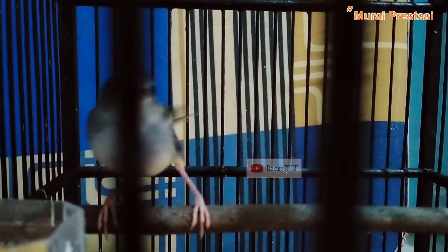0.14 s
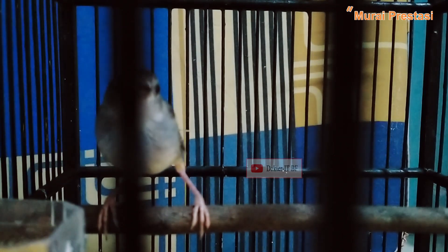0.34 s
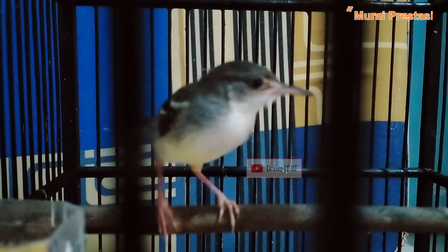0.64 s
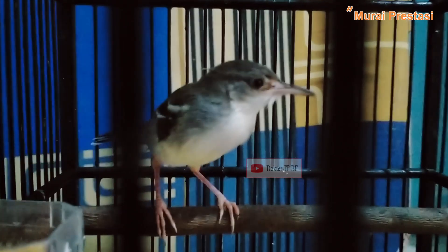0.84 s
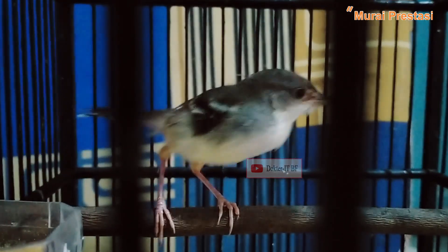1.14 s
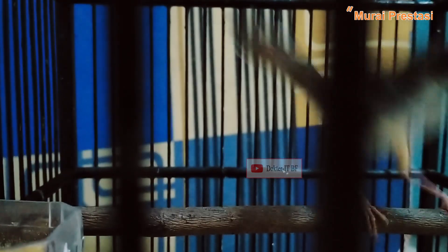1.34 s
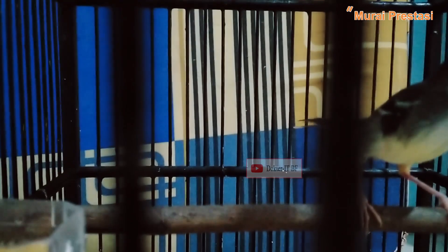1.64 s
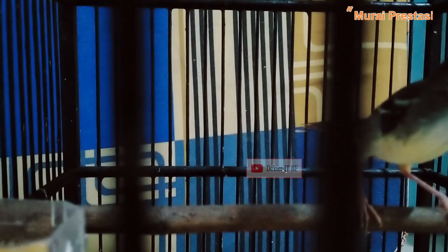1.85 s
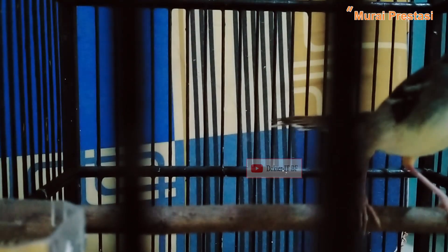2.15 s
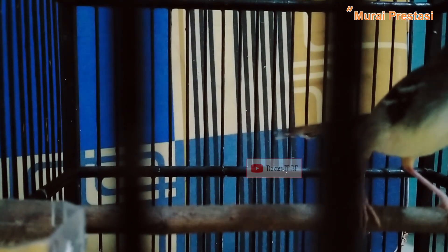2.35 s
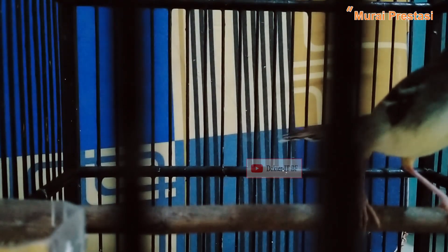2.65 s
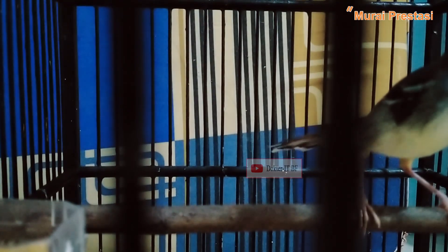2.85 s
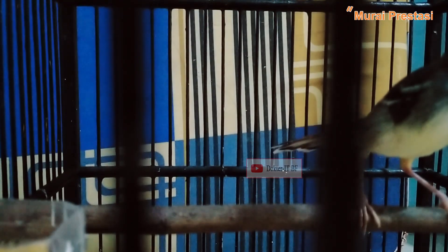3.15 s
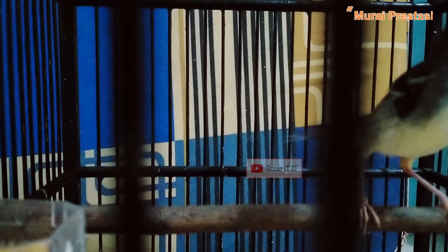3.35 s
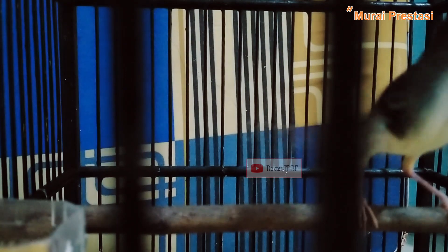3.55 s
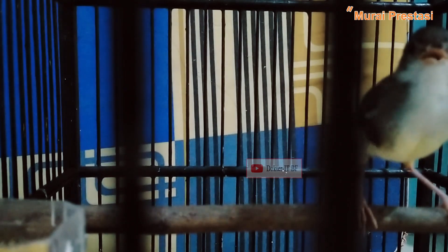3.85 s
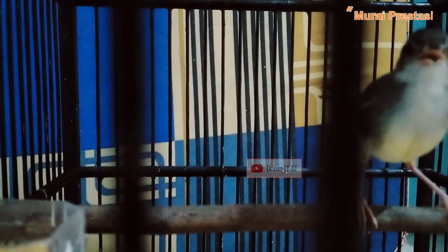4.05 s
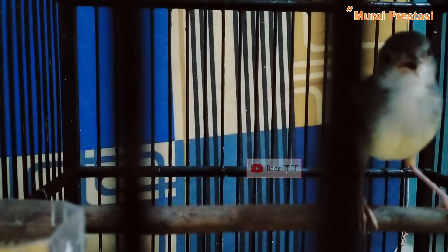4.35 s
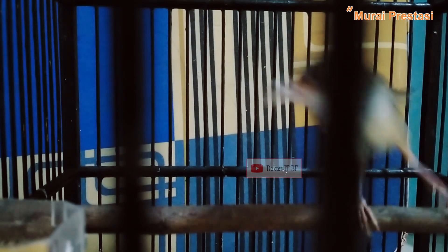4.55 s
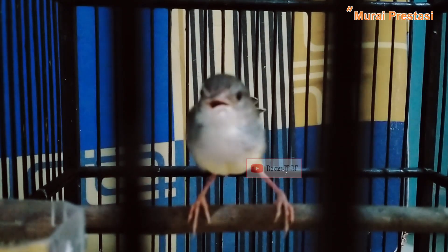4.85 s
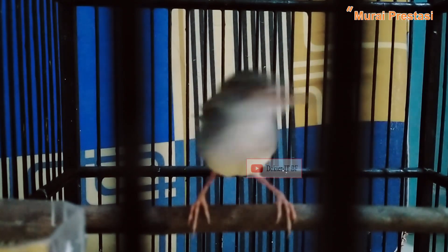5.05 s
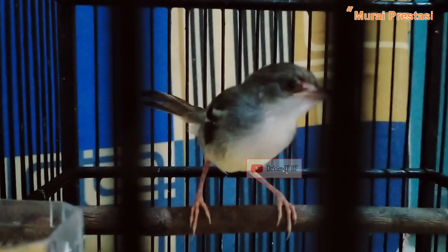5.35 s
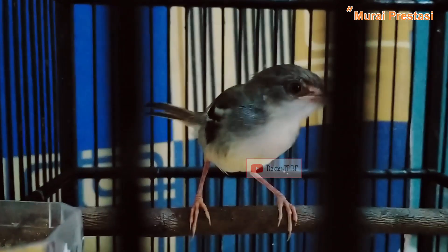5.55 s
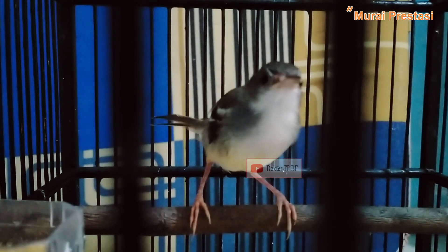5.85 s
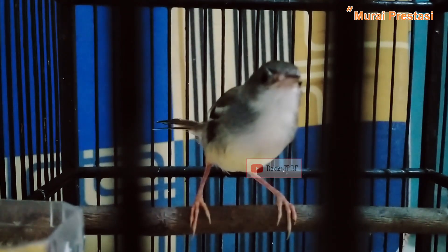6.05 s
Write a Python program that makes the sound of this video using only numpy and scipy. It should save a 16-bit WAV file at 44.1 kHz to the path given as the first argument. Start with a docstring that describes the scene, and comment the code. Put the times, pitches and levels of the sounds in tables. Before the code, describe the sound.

A small caged bird shuffles on its perch, then gives five loud, sharp whistled notes over distant birds and a faint passing vehicle.

```python
"""On a sheltered porch a small caged bird gives five loud whistled notes and shuffles about its perch.
Its syrinx sounds a harmonic series, coloured by throat and beak and echoed by the porch and the walls
beyond; its feathers and feet rustle by friction. Other birds whistle far off, and a vehicle passes in
the street with a throbbing engine boom and a roar of tyres. A deep hum and a soft hiss lie under it all."""
import sys
import numpy as np
from scipy import signal
from scipy.fft import rfft, irfft
from scipy.io import wavfile
from scipy.ndimage import map_coordinates

SR = 44100
rng = np.random.default_rng(int(sys.argv[2]) if len(sys.argv) > 2 else 0)


def unload_wav(signal):
    """Save mono or channel-first audio to the path in sys.argv[1] as 16-bit WAV at rate SR, clipped to [-1, 1]."""
    wavfile.write(
        sys.argv[1],
        SR,
        np.round(np.clip(np.atleast_2d(signal).T, -1, 1) * 32767).astype(np.int16),
    )


N = 273155
T = np.arange(N) / SR

# Bright microphone colouring heard on the hiss and rustles: a peak near 8 kHz and a rise toward 15 kHz.
# Each row: frequency in Hz, relative level in dB.
MICROPHONE_COLOUR = [(1500, -4.5), (3000, 1), (5000, -8), (7000, -6.5), (7900, 0.5), (9000, -11),
                     (12000, -11), (14000, -5.5), (15700, -1.5), (20000, 2.5)]


def from_db(db):
    """Amplitude ratio: a factor of ten for every 20 dB."""
    return 10 ** (np.asarray(db) / 20)


def rms_one(x):
    """Normalisation to unit mean power."""
    return x / np.sqrt(np.mean(x ** 2) + 1e-20)


def in_time(rows, t=T):
    """Linear interpolation of each column between the times in the first."""
    times, *columns = np.transpose(rows)
    return [np.interp(t, times, column) for column in columns]


def drift(hz):
    """Random fluctuation of unit rms: white noise twice through a one-pole low-pass."""
    pole = np.exp(-2 * np.pi * hz / SR)
    once = signal.lfilter([1], [1, -pole], rng.standard_normal(N + SR))
    return rms_one(signal.lfilter([1], [1, -pole], once)[SR:])


def coloured(spectrum):
    """Spectral shaping: white noise weighted by levels over log frequency, at unit rms."""
    hz, level_db = np.transpose(spectrum)
    log_hz = np.log(np.arange(1, N // 2 + 2) * SR / N)
    gain = from_db(np.interp(log_hz, np.log(hz), level_db))
    return rms_one(irfft(rfft(rng.standard_normal(N)) * gain, N))


def resonance(x, hz, width_hz):
    """A damped resonator: two poles, unit gain at the peak."""
    r = np.exp(-np.pi * width_hz / SR)
    gain = (1 - r * r) / 2
    return signal.lfilter([gain, 0, -gain], [1, -2 * r * np.cos(2 * np.pi * hz / SR), r * r], x)


def echoes(x, t60_s, gap_s=.0065):
    """Reverberation: after a short gap, dense reflections decay exponentially; the tail has unit energy."""
    t = T[:SR // 2]
    tail = rng.standard_normal(len(t)) * from_db(-60 * t / t60_s) * (t > gap_s)
    return signal.fftconvolve(x, tail / np.sqrt(np.sum(tail ** 2)))[:N]


def hiss():
    """Broadband ambient noise: a dull floor and a swelling, ebbing treble coloured by the microphone."""
    # Each row: frequency in Hz, relative spectral density in dB.
    floor_spectrum = [(45, -14), (62, -3), (95, 1), (200, -8), (380, -11.5), (445, -1.5), (520, -11.5),
                      (900, -12.5), (2400, -22), (4500, -36), (7000, -61)]
    # Each row: time in seconds, level in dB.
    treble_swell = [(0, -67.5), (.5, -66.5), (.7, -64), (1.4, -64.5), (2.2, -61.5), (3.1, -66),
                    (3.4, -59.5), (4.5, -61), (4.9, -67.5), (5.55, -69), (6.19, -65)]
    floor = from_db(-63 + .7 * drift(3)) * coloured(floor_spectrum)
    treble = from_db(in_time(treble_swell)[0] + .8 * drift(6)) * coloured(MICROPHONE_COLOUR)
    return floor + treble


def hum(pitch_hz=27.6):
    """A deep tone, as from a fan or pump, under slight random amplitude and frequency modulation."""
    # Each row: time in seconds, level in dB.
    swell = [(0, -54), (.6, -52), (1.5, -51), (4.3, -50.5), (6.19, -52)]
    level_db = in_time(swell)[0] + .72 * drift(3.6)
    phase = 2 * np.pi * np.cumsum(pitch_hz + .28 * drift(1.6)) / SR
    return np.sqrt(2) * from_db(level_db) * np.sin(phase)


def passing(start_s, end_s, top_db, rise_db_per_s, fade_db_per_s):
    """Level falls with distance: a source nears, holds its top level from start to end, and recedes."""
    return top_db - rise_db_per_s * np.maximum(start_s - T, 0) - fade_db_per_s * np.maximum(T - end_s, 0)


def vehicle(throb_hz=6.3):
    """Noise-driven resonances make the engine's boom, which throbs while near; tyres add a broad roar."""
    # Each row: resonance frequency in Hz, bandwidth in Hz, relative gain in dB.
    engine_modes = [(48.3, 12, -1), (77.4, 12, 0), (145, 12, -1.5), (182, 26, -25.5), (224.4, 5, -4.5),
                    (287, 13, -18.5), (419, 19, -17)]
    # Each row: frequency in Hz, relative spectral density in dB.
    tyre_spectrum = [(180, -29.5), (300, -6), (576, -9), (704, 0), (1100, -0.5), (1280, -4.5), (2340, -6),
                     (4220, -28.5), (6000, -38), (7800, -37.5), (13200, -120)]
    noise = rng.standard_normal(N)
    boom = sum(from_db(gain_db) * resonance(noise, hz, width) for hz, width, gain_db in engine_modes)
    near = np.clip((1.3 - T) / .25, 0, 1)
    throb_db = 3 * near * np.cos(2 * np.pi * throb_hz * (T - .78))
    roar = coloured(tyre_spectrum) * from_db(passing(.76, 2.3, -57.5, 90, 26) + .7 * drift(14))
    boom_db = passing(.77, 1.22, -49.5, 75, 11) + throb_db + 1.2 * drift(8)
    return rms_one(boom) * from_db(boom_db) + roar


def far_birds():
    """Pure-tone glides, smeared in pitch and level by propagation across the yards."""
    # Each row: start and end in seconds, first and last pitch in Hz, relative level in dB, blur (0 to 1).
    glides = [(0, 0.07, 2150, 2190, -65, 0.47), (0, 0.107, 3120, 3000, -79, 0.3),
              (0, .07, 1750, 1730, -74, 0), (0.135, .26, 2004, 1950, -70, 0.42),
              (0.399, .51, 2780, 2857, -65, 0.1), (0.518, .66, 2790, 2810, -75, 0.37),
              (0.448, .49, 4230, 4541, -60.5, 0.7), (0.468, .792, 4500, 4400, -64.5, 0.36),
              (.5, .587, 5220, 4920, -65.5, 0.66), (0.458, .58, 13230, 13800, -65, 0.45),
              (.59, .7, 8160, 8230, -70, 0.6), (0.631, .72, 4176, 4030, -61.5, 0.59),
              (0.639, .718, 4012, 3900, -61.5, 0.59), (0.617, .68, 3500, 3350, -66, .2),
              (0.663, .715, 2750, 2460, -63.5, 0), (0.754, .9, 2400, 2354, -59.5, 0.07),
              (.716, 1.295, 9300, 9040, -78, 0.8), (1.421, 1.527, 4480, 4427, -74, 0.32),
              (1.511, 1.695, 5680, 5840, -74, .5), (1.92, 2.124, 4470, 4450, -75, 0.47),
              (2.539, 2.61, 4480, 4640, -62.5, .99), (2.543, 2.666, 4054, 3600, -66, 0.93),
              (2.634, 2.774, 3650, 3417, -62.5, 0.84), (2.6, 3.24, 9150, 9120, -76, 0.65),
              (3.993, 4.14, 2778, 2750, -48, 0.34), (4.139, 4.358, 2730, 2710, -50, 0.5),
              (4.505, 4.729, 2254, 2250, -58, 0.24), (4.767, 5.057, 2522, 2555, -57, 0.43),
              (4.909, 5.03, 3065, 2850, -61.5, 0.6), (4.986, 5.039, 5370, 4440, -63.5, 1),
              (4.989, 5.066, 4040, 3780, -63, 0.78), (5.602, 5.72, 3760, 3060, -65.5, .75),
              (5.686, 5.864, 2974, 2860, -64.5, 0.44), (5.953, 5.99, 12600, 12400, -73, .97),
              (6.103, 6.187, 6880, 6830, -62, 0.43), (6.105, 6.174, 3100, 3134, -65, 0.6)]
    out, waver, flutter = np.zeros(N), drift(200), drift(25)
    for start, end, start_hz, end_hz, level_db, blur in glides:
        part = slice(int(start * SR), int(end * SR))
        progress = np.linspace(0, 1, len(T[part]))
        hz = start_hz + (end_hz - start_hz) * progress + 330 * blur ** 2 * waver[part]
        envelope = np.sin(np.pi * progress) ** .3 * from_db(level_db + 3 * blur * flutter[part])
        out[part] += np.sqrt(2) * envelope * np.sin(2 * np.pi * np.cumsum(hz) / SR)
    return .75 * out + from_db(-4) * echoes(out, t60_s=.55)


def rustles(brush_from_hz=1500, scuff_spread=1.45):
    """Friction noise on perch and bars: a grainy brush of feathers over a duller scuff of feet."""
    # Each row: start and length in seconds, brush level in dB, top of the brush band in Hz,
    # centre of the scuff band in Hz, scuff level in dB.
    shuffles = [(0.296, 0.046, -72, 9100, 2030, -67), (0.914, 0.22, -53, 19000, 730, -47),
                (1.199, 0.13, -57.5, 19000, 2800, -55.5), (1.722, 0.27, -54.5, 19000, 750, -51),
                (2.169, .2, -62.5, 8950, 1640, -49), (2.264, 0.095, -51.5, 19000, 1220, -59),
                (2.443, 0.16, -57, 8300, 2320, -53), (2.813, .1, -59.5, 8750, 1990, -71),
                (3.026, 0.047, -66, 6000, 910, -62), (4.981, 0.0068, -59, 15400, 4000, -65),
                (5.074, 0.091, -63.5, 8535, 1115, -70), (5.3, 0.092, -65.5, 5000, 550, -58),
                (5.85, .18, -76, 4985, 1964, -67), (6.089, 0.12, -50.5, 18900, 2030, -78)]
    out = np.zeros(N)
    grain = coloured([(100, 0), *MICROPHONE_COLOUR[1:]]) * from_db(1.3 * drift(35))
    for start, length, brush_db, top_hz, scuff_hz, scuff_db in shuffles:
        part = slice(int(start * SR), int((start + 2 * length) * SR))
        progress = (T[part] - start) / length
        envelope = np.clip(progress * 4, 0, 1) * np.exp(-1.2 * progress ** 2)   # quick start, softer end
        scuff_edges = [scuff_hz / scuff_spread, scuff_hz * scuff_spread]
        for edges, level_db in [([brush_from_hz, top_hz], brush_db), (scuff_edges, scuff_db)]:
            band = signal.butter(2, edges, "band", fs=SR, output="sos")
            out[part] += from_db(level_db) * envelope * rms_one(signal.sosfilt(band, grain[part]))
    return out


def unsteady_pitch(tremble_share=.009, wander_share=.003):
    """Random frequency modulation: a pitch ratio near 1 with a fast tremble and a slower wander."""
    tremble = rng.standard_normal(N)
    for _ in range(3):   # steep skirts keep the gaps between the partials clear
        tremble = rms_one(resonance(tremble, hz=110, width_hz=180))
    return 1 + tremble_share * tremble + wander_share * drift(35)


def voice_catches():
    """Share of pitch lost as the voice catches: a sudden drop, then exponential relaxation."""
    # Each row: start in seconds, approximate share of pitch lost, recovery time constant in seconds.
    catches = [(3.259, .2, .003), (3.535, .15, .002), (3.541, .16, .002), (3.56, .22, .002),
               (3.938, .03, .003)]
    drop = np.zeros(N)
    for start, depth, recovery in catches:
        age = np.maximum(T - start, 0) / recovery
        drop += depth * 1.6 * (np.exp(-age) - np.exp(-6 * age))
    return drop


def partial_levels(effort_db, closing, turn_db, usual_db=-19.5, third_full_db=-20.5):
    """Spectral envelope in dB: partials grow with effort and shift as the beak closes and the head turns."""
    # Each row, for partials 1 to 6: level at usual effort in dB, dB gained per dB of effort,
    # change in dB as the beak closes.
    partials = [(-42.5, 0.18, 2), (-19.5, 1, 0.5), (-26, 0.67, -11), (-61.5, 0.04, 17), (-50, 0.43, -1.5),
                (-27, 0.6, 2)]
    base_db, growth, closing_db = np.transpose(partials)[:, :, None]
    drive_db = np.tile(effort_db - usual_db, (6, 1))
    drive_db[2] = np.minimum(drive_db[2], third_full_db - usual_db)   # the third partial saturates
    level_db = base_db + growth * drive_db + closing_db * closing
    level_db[[2, 4, 5]] += np.array(turn_db)[:, None]
    return level_db


def caged_bird(fall_to_share=.4, fall_rough=.09):
    """Source and filter: harmonics of the syrinx slide through the colour set by throat and beak."""
    # The held part of each note. Each row: time in seconds, pitch in Hz,
    # effort in dB (about the level of the second partial).
    notes = [
        [(3.266, 2419, -37), (3.299, 2418, -27), (3.332, 2451, -22), (3.364, 2449, -20), (3.397, 2447, -15),
         (3.43, 2419, -17)],
        [(3.536, 2479, -30), (3.567, 2494, -30), (3.598, 2437, -22), (3.63, 2426, -16), (3.661, 2409, -14),
         (3.692, 2388, -15)],
        [(3.811, 2417, -29), (3.841, 2404, -26), (3.871, 2392, -22), (3.902, 2371, -20), (3.932, 2357, -21),
         (3.962, 2328, -26)],
        [(4.091, 2381, -35), (4.117, 2361, -27), (4.143, 2356, -22), (4.17, 2396, -19), (4.196, 2373, -16),
         (4.222, 2339, -14)],
        [(4.336, 2363, -28), (4.362, 2352, -25), (4.389, 2388, -23), (4.415, 2360, -20), (4.442, 2334, -16),
         (4.468, 2260, -17)],
    ]
    # The slides into and out of each note. Each row: rise and fall in seconds, hoarseness of the rise and
    # opening pitch as shares of the held pitch, opening and final gain in dB, closing time of the beak
    # in seconds, dB added to partials 3, 5 and 6 by the turn of the head.
    slides = [(.032, 0.014, 0.46, .6, -11, -15.5, 0.0093, 0.5, 0, -2.5),
              (.018, .015, .08, 0.34, -7.5, -14, 0.032, 0.5, -0.5, 1),
              (0.02, 0.022, 0.24, 0.19, -8, -4, 0.025, -5, -4, -0.5),
              (.019, 0.014, 0.1, .45, -2.5, -15.5, 0.012, -3, 7.5, -4.5),
              (.015, .019, 0.107, 0.53, -7.5, -17.5, 0.018, -3, 4, -8.5)]
    # Air rushing past the syrinx. Each row: frequency in Hz, relative spectral density in dB.
    rasp_spectrum = [(1500, -30), (3500, -16), (5200, -12), (5900, -2), (6600, -12), (8600, -24),
                     (10800, -20), (12800, -6), (13600, 3), (15000, 6), (15800, 8)]
    out, unsteady, catch = np.zeros(N), unsteady_pitch(), voice_catches()
    shimmer_db = [.8 * drift(80), .8 * drift(80)]   # even and odd partials
    air, hoarse = coloured(rasp_spectrum), drift(300)
    for held, (rise, fall, rise_rough, from_share, in_db, out_db, close_s, *turn_db) in zip(notes, slides):
        start, end = held[0][0], held[-1][0]
        part = slice(int((start - rise) * SR), int((end + fall) * SR))
        t = T[part]
        pitch, effort_db = in_time(held, t)
        closing = np.clip(1 - (end - t) / close_s, 0, 1)
        held_db = partial_levels(effort_db, closing, turn_db)
        before = np.clip((start - t) / rise, 0, 1)   # 1 to 0 over the rise
        after = np.clip((t - end) / fall, 0, 1)   # 0 to 1 over the fall
        share = 1 - (1 - from_share) * before ** 1.4 - (1 - fall_to_share) * after ** 1.1
        share *= (unsteady - catch)[part]
        # The membranes run unevenly while they start and stop.
        share *= 1 + (rise_rough * np.sqrt(before) + fall_rough * after) * hoarse[part]
        fade = np.minimum(1, 3 * (1 - before) * (1 - after))
        envelope = from_db(in_db * before + out_db * after ** 1.4) * fade
        # Levels at 0 to 8 times the held pitch; the colour is flat above that.
        colour_db = np.array([held_db[0] - 11.5, *held_db, held_db[-1] - 8, held_db[-1] - 16])
        phase = 2 * np.pi * np.cumsum(pitch * share) / SR
        for k in range(1, 15):
            place = np.clip(k * share, 0, len(colour_db) - 1)
            level_db = map_coordinates(colour_db, [place, np.arange(len(t))], order=1)
            level_db += np.sqrt(k) * shimmer_db[k % 2][part]   # higher partials flicker more
            audible = k * pitch * share < .45 * SR
            out[part] += np.sqrt(2) * audible * envelope * from_db(level_db) * np.sin(k * phase)
        # The rasp follows the second partial and flares on slides and catches.
        rasp_db = -46 + .6 * (held_db[1] + 20) + 18 * (before + after + 2 * catch[part])
        out[part] += envelope * from_db(rasp_db) * air[part]
    return out


def porch(direct):
    """Direct sound plus the porch's short reverberation and a longer, fainter tail from walls beyond."""
    return direct + from_db(-12.5) * echoes(direct, t60_s=.22) + from_db(-24) * echoes(direct, t60_s=.45)


def scene():
    """Superposition of all sources in one channel."""
    return (hiss() + hum() + vehicle() + far_birds() + rustles() + porch(caged_bird()))[None]


def record(dry):
    """Band limiting: a steep low-pass removes the highest treble."""
    cutoff_hz = 15800
    return signal.sosfilt(signal.ellip(12, .5, 80, cutoff_hz, fs=SR, output="sos"), dry)


dry = scene()
out = record(dry)
unload_wav(out)
```